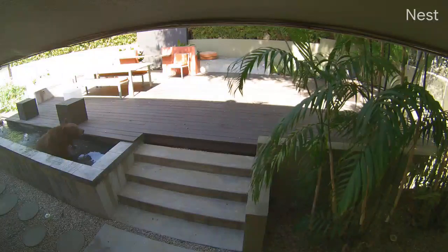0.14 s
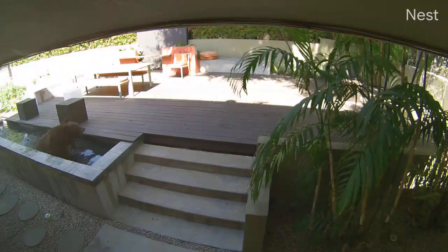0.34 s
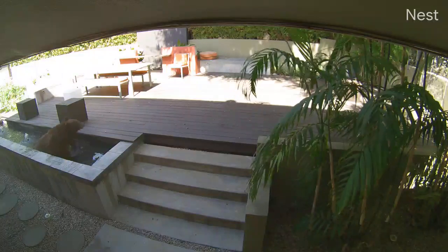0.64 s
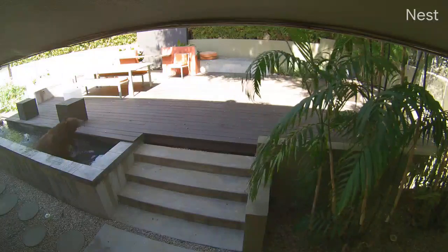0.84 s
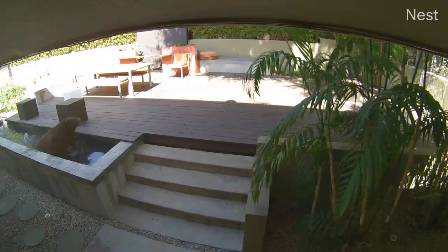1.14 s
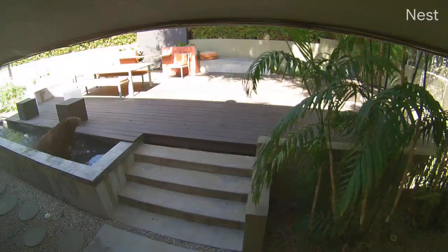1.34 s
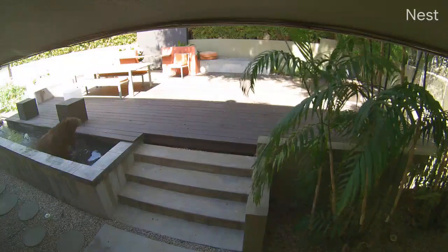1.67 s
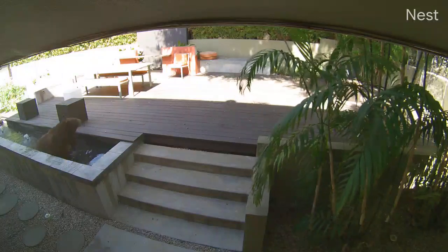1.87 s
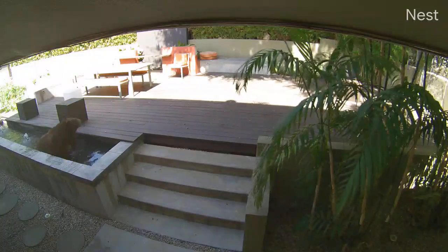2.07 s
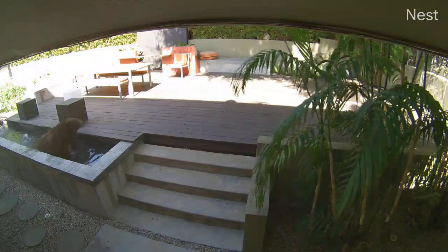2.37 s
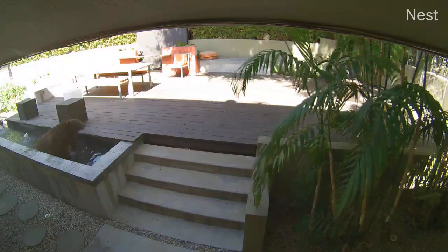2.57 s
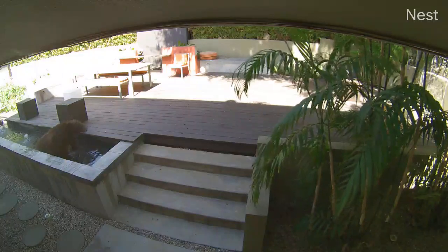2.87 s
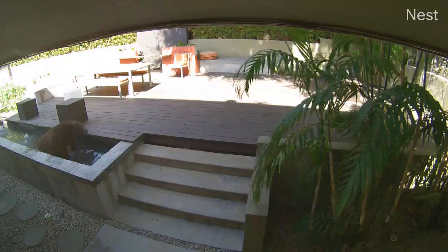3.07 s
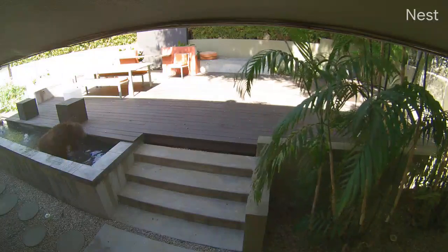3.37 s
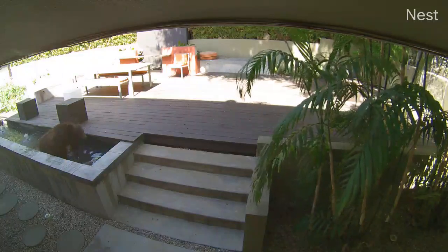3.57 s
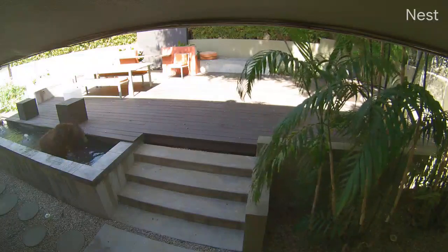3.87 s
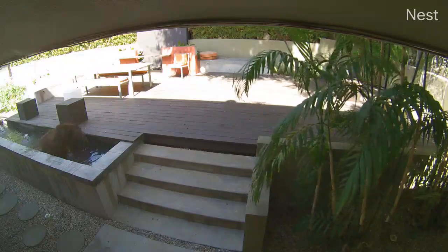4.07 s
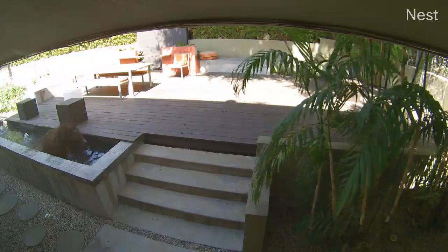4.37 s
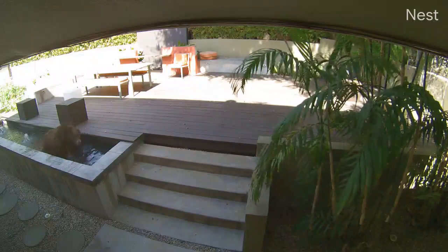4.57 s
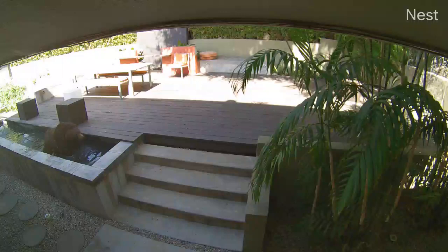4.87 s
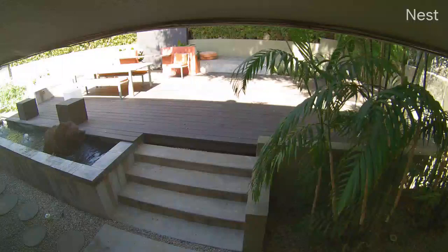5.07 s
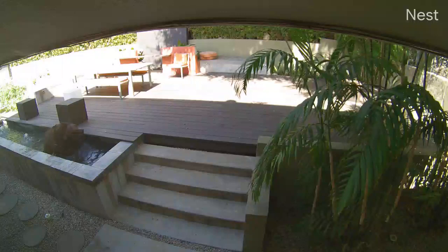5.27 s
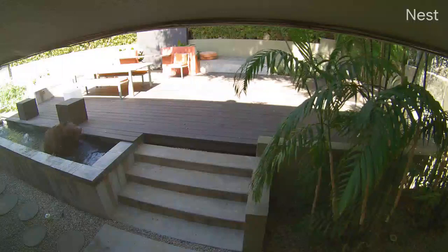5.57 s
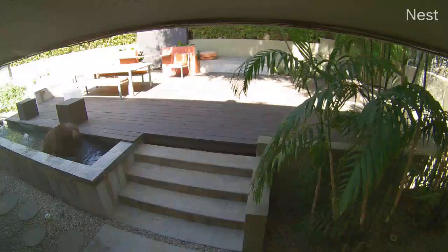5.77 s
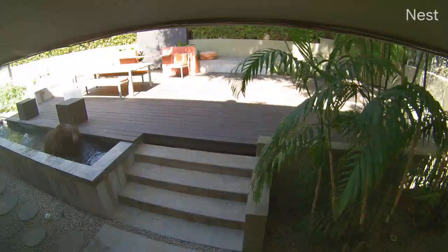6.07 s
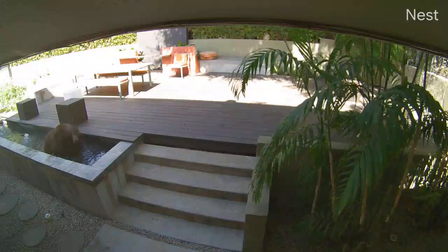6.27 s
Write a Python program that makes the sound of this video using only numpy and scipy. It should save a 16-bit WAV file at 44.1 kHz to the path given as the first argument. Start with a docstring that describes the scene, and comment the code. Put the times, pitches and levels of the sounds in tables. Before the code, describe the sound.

Running, sloshing water in a backyard basin as an animal moves about. At first moderate, uneven swishing with plinks and gulps; midway a short hissing splash, then busier churning. Near the end come rapid bubbles, a hard slap and tearing splashes, followed by deep gurgles and a quick calming. The sound is narrow, bright and slightly metallic, with a faint low rumble and close reflections from stone.

```python
"""Large animal wading in a garden basin

Spray, churn and slosh are swarms of random bubbles over noise, swelling with the animal's movements.
Drops plink and air pockets gulp as rising bubble tones; sheets of water burst as short hisses.
A sharper splash with one flat smack comes near the end; a low rumble of filtered noise lies below.
The small microphone under the eaves rings near 4 kHz; its gain ducks briefly after the loudest peaks."""
import sys
import numpy as np
from scipy import signal
from scipy.fft import rfft, irfft
from scipy.io import wavfile
from scipy.ndimage import uniform_filter1d, map_coordinates

SR = 44100
rng = np.random.default_rng(int(sys.argv[2]) if len(sys.argv) > 2 else 0)


def persist_wave(psi):
    """Save psi, clipped to +-1, as 16-bit WAV."""
    counts = np.round(np.clip(psi, -1, 1) * 32767).astype(np.int16)
    wavfile.write(sys.argv[1], SR, np.atleast_2d(counts).T)


N = 283518
TIME = np.arange(N) / SR


def from_db(db):
    """Decibels to gain."""
    return 10 ** (np.asarray(db) / 20)


def rms_one(x):
    """Scale to rms 1."""
    return x / np.sqrt(np.mean(x ** 2) + 1e-20)


def drift(rate_hz):
    """Random curve of rms 1: straight lines between `rate_hz` random points a second."""
    return rms_one(np.interp(TIME * rate_hz, np.arange(2000), rng.standard_normal(2000)))


def band(x, low_hz, high_hz):
    """Causal band-pass."""
    return signal.sosfilt(signal.butter(2, [low_hz, high_hz], "band", fs=SR, output="sos"), x)


def coloured(x):
    """Give a flat sound the colour of the water as the small microphone hears it."""
    # colour of water through the microphone, its port ringing near 4 kHz: f/Hz, relative density/dB
    colour = [(40, -24.5), (90, -23), (230, -23), (420, -14.5), (1100, -10), (1900, -10), (2600, -4),
              (3300, -5), (3900, -0.5), (4350, -1.5), (5000, -12), (5600, -20.5), (6800, -26), (7600, -45)]
    hz, db = np.transpose(colour)
    log_bins = np.log(np.fft.rfftfreq(2 * N, 1 / SR) + 1)
    gain = from_db(np.interp(log_bins, np.log(hz), db))
    return irfft(rfft(x, 2 * N) * gain)[:N]


def add(out, start_s, sound):
    """Mix a sound in at start_s."""
    start = int(np.clip(start_s * SR, 0, N - 1))
    out[start:start + len(sound)] += sound[:N - start]


def bubble(age_s, hz, t60_s, rise, onset_s):
    """A dying sine whose pitch climbs as the bubble nears the surface."""
    phase = 2 * np.pi * hz * age_s * (1 + rise * np.minimum(age_s / t60_s, 2) / 2)
    return np.sin(phase) * from_db(-60 * age_s / t60_s) * (1 - np.exp(-age_s / onset_s))


def swarm(low_hz, high_hz, per_s, cycles, spread_db, wash_db, patchy_db):
    """Countless random bubbles of one size range, over a noise wash of those too small to tell apart."""
    edges_hz = np.geomspace(low_hz, high_hz, num=49)
    bubbles = np.zeros(N)
    for low, high in zip(edges_hz, edges_hz[1:]):
        draws = rng.random((int(per_s * N / SR / len(edges_hz) * 2) + 2, 3))
        wait, size, detune = draws.T
        # exponential waits: births are independent of each other
        births_s = np.cumsum(-np.log(1 - wait)) * len(edges_hz) / per_s
        gains = from_db(spread_db * np.minimum(-np.log(1 - size), 3)) * high
        pitches_hz = low + (high - low) * detune
        for s, gain, hz in zip(births_s[births_s < N / SR], gains, pitches_hz):
            t60_s = cycles / hz
            add(bubbles, s, gain * bubble(TIME[:int(t60_s * SR)], hz, t60_s, rise=0.052, onset_s=0.00006))
    wash = band(rng.standard_normal(N), low_hz, high_hz) * from_db(patchy_db * drift(60))
    return rms_one(rms_one(coloured(bubbles)) + from_db(wash_db) * rms_one(coloured(wash)))


def surges():
    """Each surge swells and sinks again, in dB over the general effort."""
    # surges thrown up by a movement, or lulls if negative: crest t/s, swell/dB, length/s
    surge_rows = [(0.157, 2, 0.043), (0.239, 4.5, 0.098), (0.355, 1.5, .08), (0.52, 3.4, 0.26),
                  (0.892, 2.5, 0.074), (1.064, 2.5, 0.17), (1.36, 2, .2), (1.813, 3.5, 0.24),
                  (2.197, 2.5, 0.14), (2.347, 3.5, 0.053), (2.708, 3, 0.24), (2.984, 4.5, 0.058),
                  (3.172, 3, 0.06), (3.62, -0.5, 0.074), (3.907, 2, 0.09), (4.26, -2.5, 0.1),
                  (4.5, 1.5, 0.16), (5.037, 4.5, 0.17), (5.141, 5, 0.049), (5.307, 2.5, 0.23),
                  (5.367, 3, 0.049), (5.411, -3, 0.033), (5.534, 2.5, 0.091), (5.927, 3.5, 0.058),
                  (6.105, 2.5, 0.068)]
    rise_share = 0.6
    swell_db = np.zeros(N)
    for crest_s, db, length_s in surge_rows:
        start_s = crest_s - rise_share * length_s
        end_s = crest_s + (1 - rise_share) * length_s
        swell_db += np.interp(TIME, [start_s, crest_s, end_s], [0, db, 0])
    return swell_db


def echoes(x, sway_s, sway_rate_hz):
    """Hard faces near the basin repeat the sound; each path changes as the water shifts about."""
    # paths by basin rim, steps, wall and eaves: delay/s, level/dB
    echo_paths = [(.0027, -22.5), (.0053, -5.5), (.0072, -5.5), (0.015, -5), (0.0182, -2.5)]
    out, power = x, 1
    for delay_s, db in echo_paths:
        path_s = delay_s + sway_s * drift(sway_rate_hz)
        out = out + from_db(db) * map_coordinates(x, [(TIME - path_s) * SR], order=1)
        power = power + from_db(db) ** 2
    return out / np.sqrt(power)


def moving_water():
    """Three bubble sizes follow the animal's effort and surges, the larger ones less closely."""
    # how hard the animal stirs the water, used relative to calm: t/s, level/dB
    effort = [(0, -52.5), (.5, -51), (.8, -52), (1.15, -50.5), (1.62, -53.5), (1.85, -53), (2.4, -52),
              (3.1, -52.5), (3.55, -49), (4.0, -50), (4.29, -51.5), (4.55, -49), (4.88, -47.5),
              (5.3, -45.5), (5.62, -46), (5.9, -44), (6.02, -49), (6.43, -54.5)]
    calm_db = -51.5
    effort_db = np.interp(TIME, *np.transpose(effort)) - calm_db
    surge_db = surges()
    spray_gain = from_db(-52.5 + 0.98 * effort_db + surge_db)
    churn_gain = from_db(-56.5 + 0.92 * effort_db + 0.81 * surge_db)
    slosh_gain = from_db(-63.5 + 0.5 * effort_db + 0.81 * surge_db)
    spray = swarm(3347, 7000, per_s=800, cycles=95, spread_db=3.0, wash_db=-4.5, patchy_db=-2.0)
    churn = swarm(1400, 3300, per_s=380, cycles=45, spread_db=3.5, wash_db=0, patchy_db=2.1)
    slosh = swarm(279.6, 1361, per_s=220, cycles=30, spread_db=1.0, wash_db=2, patchy_db=1.46)
    # short waves glance off the narrow stone faces; long ones bend round them
    bright = echoes(spray_gain * spray + churn_gain * churn, sway_s=0.00018, sway_rate_hz=3)
    clumps = from_db(0.03 * drift(90))  # very slight flicker
    return bright * clumps + slosh_gain * slosh


def splashes():
    """A falling sheet of water tears into gobbets and bursts into a lumpy, quickly dying hiss."""
    # sheets that slap down: t/s, initial rms/dB, t60/s, lower edge f/Hz, upper edge f/Hz
    sheets = [(.225, -62, .3, 330, 1100), (1.3, -62.5, .25, 330, 900), (3.491, -42.5, 0.11, 1990, 7000),
              (3.699, -59, 0.18, 121, 750), (3.92, -59, 0.14, 100, 796), (4.64, -60, 0.26, 350, 800),
              (5.05, -52.5, 0.38, 600, 1430), (5.436, -36.5, .057, 2520, 6900),
              (5.545, -50, .45, 460, 1800), (5.585, -45, 0.21, 1400, 2750), (5.651, -42, 0.047, 2000, 4780),
              (5.6618, -34, 0.042, 1510, 5660), (5.678, -47, 0.19, 400, 1080),
              (5.711, -40.5, 0.17, 1970, 4400), (5.781, -45.5, 0.14, 300, 1780),
              (5.916, -44, 0.17, 3400, 4800), (5.918, -53.5, 0.22, 352, 1300), (6.095, -50, .29, 85, 1060)]
    grain_db, grains_per_s = 2, 350
    rise_cycles = 0.96  # of the lower edge, so deep sheets start softly
    out = np.zeros(N)
    for s, db, t60_s, low_hz, high_hz in sheets:
        gobbets = rng.standard_normal(N) * from_db(grain_db * drift(grains_per_s))
        burst = rms_one(coloured(band(gobbets, low_hz, high_hz)))
        decay = from_db(db - 60 * TIME / t60_s)
        rise = np.minimum(TIME * low_hz / rise_cycles, 1)
        add(out, s, burst * decay * rise)
    return out


def smack():
    """A slap so short that only the ring of the microphone port gives it a pitch."""
    # port resonances, relative: f/Hz, level/dB, t60/s
    port = [(2470, -7, 0.005), (3400, -13, 0.0024), (4320, -2.5, 0.0068), (5600, -20, .002)]
    start_s, peak_db = 5.66, -22
    age_s = TIME[:SR // 20]
    ring = sum(from_db(db) * bubble(age_s, hz, t60_s, rise=0, onset_s=0.00043) for hz, db, t60_s in port)
    out = np.zeros(N)
    add(out, start_s, from_db(peak_db) * ring / np.abs(ring).max())
    return out


def bubble_clusters(rows, rise, onset_s, scatter, lag, follower_db, count):
    """A loud bubble sheds a few weaker ones of scattered pitch just after it."""
    out, age_s = np.zeros(N), TIME[:SR // 4]
    for s, db, hz, t60_s in rows:
        add(out, s, from_db(db) * bubble(age_s, hz, t60_s, rise, onset_s))
        for late, detune in rng.random((count, 2)):
            pitch_hz = hz * (1 + scatter * (2 * detune - 1))
            follower = from_db(db + follower_db) * bubble(age_s, pitch_hz, t60_s, rise, onset_s)
            add(out, s + lag * late * t60_s, follower)
    return out


def drops():
    """Drops that hit the surface each ring a small, high bubble."""
    # t/s, level/dB, bubble f/Hz, t60/s
    drop_rows = [(0.119, -35.5, 4010, 0.021), (.456, -41.5, 3560, 0.02), (0.481, -37, 4270, 0.015),
                 (.613, -41.5, 4150, 0.026), (.713, -39, 3880, .025), (0.866, -43.5, 2255, 0.032),
                 (1.088, -36.5, 3970, .012), (1.097, -42.5, 2440, .03), (1.204, -43, 3860, 0.037),
                 (1.354, -35.5, 4030, 0.022), (1.968, -40, 4170, .025), (2.465, -31, 3990, 0.014),
                 (2.524, -37.5, 3950, 0.018), (2.621, -38.5, 3930, 0.023), (2.684, -35.5, 4030, 0.03),
                 (2.708, -31.5, 4070, 0.027), (2.736, -42.5, 4010, 0.044), (2.98, -46.5, 2920, .04),
                 (3.205, -38, 3890, 0.022), (3.273, -34.5, 2590, 0.022), (3.316, -45, 3770, .04),
                 (3.33, -41, 3640, 0.064), (3.493, -36, 4040, 0.029), (3.515, -39, 3980, .025),
                 (3.704, -35.5, 4020, 0.03), (4.045, -39.5, 3920, 0.021), (4.13, -46.5, 4200, 0.024),
                 (4.496, -37, 4220, 0.028), (4.751, -41, 3780, .025), (4.782, -38.5, 3700, 0.03),
                 (4.827, -37.5, 3920, 0.029), (4.906, -39, 4420, 0.018), (4.939, -27.5, 3800, 0.01),
                 (5.01, -31.5, 3730, 0.015), (5.066, -33, 3820, 0.028), (5.211, -26, 4020, 0.016),
                 (5.285, -32, 3950, 0.019), (5.303, -31, 4010, 0.036), (5.325, -36, 2270, 0.024),
                 (5.339, -38, 2290, .03), (5.465, -33, 4140, 0.026), (5.483, -38, 2335, 0.06),
                 (5.494, -33, 3560, 0.032), (5.722, -33, 3900, 0.025), (6.11, -37, 4360, .025),
                 (6.243, -36, 3300, 0.016)]
    return bubble_clusters(drop_rows, rise=0.013, onset_s=0.0004, scatter=0.23, lag=0.77,
                           follower_db=-16.5, count=2)


def gulps():
    """Air pockets that break up under water ring low and climb in pitch."""
    # t/s, level/dB, bubble f/Hz, t60/s
    gulp_rows = [(0.136, -54, 805, .039), (0.214, -49, 578, .055), (0.311, -48.5, 410, .075),
                 (.466, -55, 1170, .04), (.602, -49.5, 1160, .04), (.838, -54, 1120, .04),
                 (0.957, -55, 973, .052), (1.008, -55, 800, .05), (1.08, -54.5, 378, .14),
                 (1.315, -50, 1270, .06), (1.322, -54, 435, .06), (1.47, -56, 1170, .045),
                 (1.585, -52.5, 435, .06), (1.745, -55.5, 445, .07), (1.772, -56, 835, .04),
                 (1.775, -50, 1210, .04), (1.828, -55, 1360, .05), (1.888, -52, 1240, .05),
                 (2.095, -56.5, 450, .06), (2.2, -57, 1055, .06), (2.32, -55, 405, .07),
                 (2.436, -53, 413, .06), (2.54, -55.5, 844, .05), (2.795, -48, 1126, .045),
                 (2.852, -55, 1100, .04), (3.36, -54, 757, .05), (3.495, -48, 1280, .075),
                 (3.711, -51, 454, .08), (3.92, -50, 407, .05), (4.304, -53.5, 610, .04),
                 (4.637, -51, 580, .05), (4.815, -50, 940, .04), (5.021, -43.5, 1084, .045),
                 (5.025, -44.5, 810, .04), (5.048, -48, 1170, .035), (5.072, -45.5, 643, .04),
                 (5.072, -40.5, 980, .05), (5.52, -43, 1700, .025), (5.587, -33.5, 1850, .035),
                 (5.59, -45, 1350, .035), (5.605, -36, 1970, .04), (5.61, -49, 806, .035),
                 (5.612, -41, 1710, .025), (5.621, -36.5, 2070, .03), (5.687, -41, 800, .04),
                 (5.785, -47, 450, .045), (5.892, -53, 587, .05), (5.908, -48.5, 695, .045),
                 (5.925, -55.5, 870, .037), (5.93, -48, 600, .04), (6.04, -44.5, 600, .035),
                 (6.083, -43.5, 553, .085), (6.101, -45.5, 296, .11), (6.108, -50.5, 385, .09),
                 (6.113, -46, 704, .06), (6.135, -51, 555, .05), (6.15, -48.5, 817, .05),
                 (6.197, -50.5, 687, .045)]
    return bubble_clusters(gulp_rows, rise=0.12, onset_s=0.00033, scatter=0.26, lag=0.9,
                           follower_db=-13, count=2)


def rumble():
    """The body of water rumbles as low noise that sags freely but swells only a little."""
    noise = rms_one(coloured(band(rng.standard_normal(N), 42, 280)))
    flicker_db = np.minimum(5.5 * drift(18), 5)
    return from_db(-75.5 + flicker_db) * noise


def yard(x, wet_db):
    """Add a short, thin tail of decaying noise from walls, steps and eaves."""
    t60_s, gap_s = 0.34, 0.004
    age_s = TIME[:SR // 2]
    tail = rng.standard_normal(len(age_s)) * from_db(-60 * age_s / t60_s) * (age_s > gap_s)
    return x + from_db(wet_db) * signal.fftconvolve(x, tail / np.linalg.norm(tail))[:N]


def scene():
    """All the water; the separate events leave a short tail in the yard."""
    events = yard(drops() + splashes() + smack(), wet_db=-5.5)
    gulp_sound = yard(gulps(), wet_db=-13.5)  # the gulps leave only a faint tail
    return (moving_water() + events + gulp_sound + rumble())[None]


def gain_control(x, threshold_db, duck_db, snap_db, lag_s, hold_s, snap_s):
    """A peak over the threshold turns the gain down a moment later; it overshoots, then comes back."""
    over = np.abs(x[0]) > from_db(threshold_db)
    held_db = np.zeros(N)
    for db, length_s in ((duck_db, hold_s), (snap_db, snap_s)):
        recent_peaks = signal.fftconvolve(over, np.ones(int(length_s * SR)))[:N]
        held_db += db * (recent_peaks > 0.5)
    late_db = np.interp(TIME - lag_s, TIME, held_db)
    return x * from_db(uniform_filter1d(late_db, SR // 200))  # 5 ms smoothing


def record(dry):
    """Gain control, then the narrow band of a small camera."""
    ducked = gain_control(dry, threshold_db=-24.5, duck_db=-6, snap_db=-17,
                          lag_s=0.0205, hold_s=0.031, snap_s=0.005)
    cutoff_hz = 7800
    return signal.sosfilt(signal.ellip(10, 0.2, 70, cutoff_hz, fs=SR, output="sos"), ducked)


dry = scene()
out = record(dry)
persist_wave(out)
```